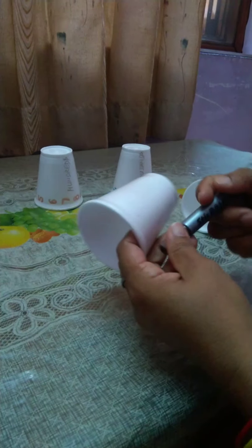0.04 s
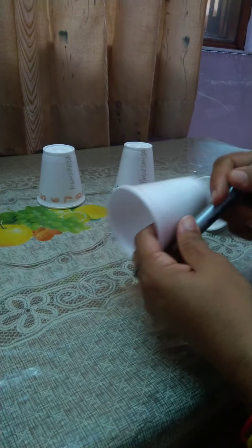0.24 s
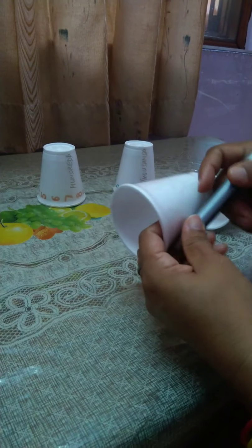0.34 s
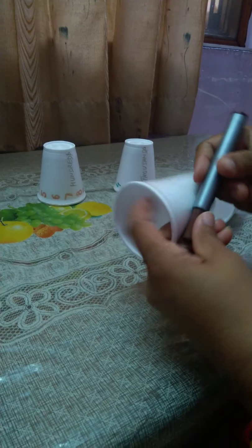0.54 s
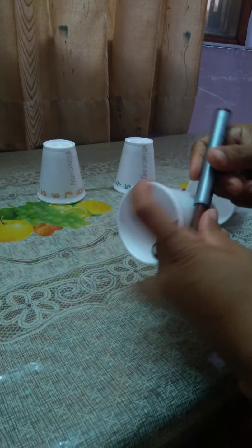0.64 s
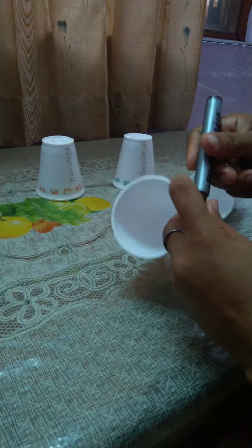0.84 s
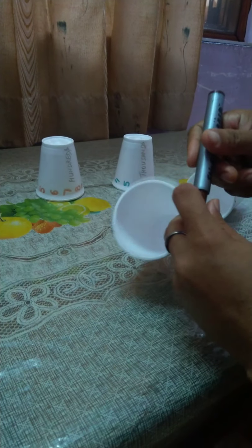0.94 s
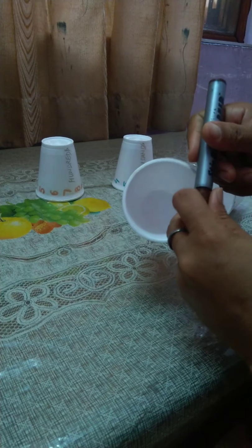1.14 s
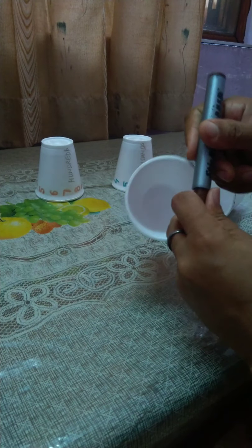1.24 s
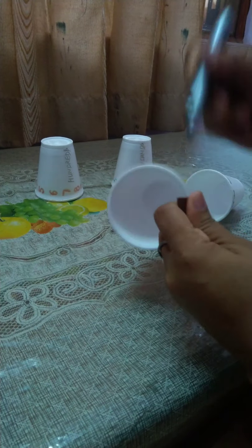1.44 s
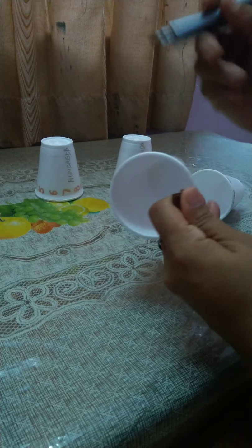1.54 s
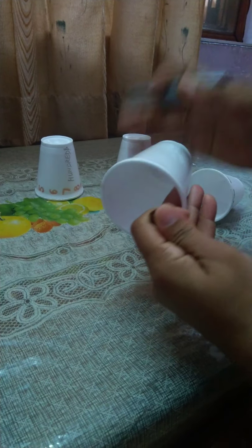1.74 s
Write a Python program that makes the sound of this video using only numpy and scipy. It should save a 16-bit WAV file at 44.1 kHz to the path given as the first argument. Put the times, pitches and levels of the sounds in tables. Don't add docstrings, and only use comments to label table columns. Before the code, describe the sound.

Foam cup handled close up: dry hissing rubs, hard clicky taps, brief scrapes over faint rumble

```python
import sys
import numpy as np
from scipy import signal
from scipy.fft import rfft, irfft
from scipy.io import wavfile
from scipy.ndimage import uniform_filter1d

SR = 44100
rng = np.random.default_rng(int(sys.argv[2]) if len(sys.argv) > 2 else 0)


def bounce(signal):
    frames = np.transpose(np.atleast_2d(signal))
    limited = np.clip(frames, -1, 1)
    pcm = np.round(limited * 32767).astype(np.int16)
    wavfile.write(sys.argv[1], SR, pcm)


def voltage_ratio(decibels):
    exponent = np.asarray(decibels, float) / 20
    return 10 ** exponent


N = 79380
TIME_S = np.arange(N) / SR
HZ = np.fft.rfftfreq(2 * N, 1 / SR)


def read(points, hz):
    f, value = np.transpose(points)
    return np.interp(np.log(hz + 1), np.log(f + 1), value)


def evened(x):
    return x / np.sqrt(np.mean(x ** 2) + 1e-20)


def colour(x, gain):
    return irfft(rfft(x, 2 * N) * gain)[..., :N]


def causal(points):
    log_gain = read(points, HZ) * np.log(10) / 20
    mirrored = np.r_[log_gain, log_gain[-2:0:-1]]
    return np.exp(np.conj(signal.hilbert(mirrored))[:N + 1])


def ring(hz, width_hz):
    return 1j * HZ * width_hz / (hz ** 2 - HZ ** 2 + 1j * HZ * width_hz)


def unit(gain):
    return gain / np.sqrt(np.mean(abs(gain) ** 2))


def modes(table):
    return unit(sum(voltage_ratio(db) * ring(hz, 1.78 * width_hz) ** 2 for hz, width_hz, db in table))


def pair(x, side, lead_s=0):
    half = voltage_ratio(read(side, HZ) / 2) * np.exp(1j * np.pi * HZ * lead_s)
    return colour(x, np.array([half, 1 / half]))


def patches(shape, bins, frames):
    over_hz = uniform_filter1d(rng.standard_normal(shape), size=bins, axis=0)
    return evened(uniform_filter1d(over_hz, size=frames, axis=1))


# start_s, length_s, peak_place (0-1), hiss_db, cup_db
STROKES = [(0.0724, 0.014, 0.05, -81, -87), (0.107, 0.049, 0.8, -57, -105), (0.186, 0.094, 0.7, -52, -60.5),
           (0.259, 0.12, 0.27, -49.5, -49), (0.279, 0.031, 0.58, -42.5, -46),
           (0.364, 0.045, 0.53, -43.5, -55), (0.392, 0.08, 0.32, -35.5, -44.5),
           (0.47, 0.14, 0.13, -47, -60), (0.547, 0.057, 0.08, -39.5, -47), (0.559, 0.052, 0.59, -34, -37.5),
           (0.588, 0.043, 0.81, -31.5, -41), (0.655, 0.14, 0, -58.5, -56.5),
           (0.739, 0.16, 0.31, -56.5, -70.5), (0.858, 0.051, 0.29, -34.5, -44.5),
           (0.87, 0.078, 0.44, -31.5, -39.5), (0.987, 0.022, 0.47, -38.5, -43.5),
           (0.993, 0.029, 0.63, -38, -46), (1.055, 0.02, 0.2, -41, -44.5), (1.121, 0.026, 0.46, -51, -62.5),
           (1.22, 0.13, 0.48, -51.5, -56), (1.312, 0.091, 0.8, -46.5, -59.5),
           (1.439, 0.021, 0.2, -60.5, -53.5), (1.457, 0.17, 0.36, -57, -62.5),
           (1.69, 0.11, 0.6, -81.5, -86.5)]
# start_s, length_s, peak_place (0-1), level_db
DRAGS = [
    (0.026, 0.26, 0.15, -79.5),
    (0.845, 0.13, 0.43, -51.5),
    (0.975, 0.039, 0.1, -64),
    (1.056, 0.027, 0, -53),
    (1.454, 0.12, 0.17, -57.5),
]


def rubbing():
    press = np.array([pressure(start, length, peak) ** 2 for start, length, peak, _, _ in STROKES])
    hiss_power, cup_power = voltage_ratio(2 * np.array(STROKES)[:, 3:].T) @ press
    drag_power = sum(voltage_ratio(2 * db) * pressure(start, length, peak) ** 2 for start, length, peak, db in DRAGS)
    fingers = skin(np.sqrt(hiss_power) * wide_slips())
    body = cup(np.sqrt(cup_power) * slips())
    rim = cover(np.sqrt(drag_power) * slips())
    return fingers + body + rim


def pressure(start, length, peak):
    rise_power, fall_power, flat_top = 2.12, 3.2, 1.8
    u = np.clip((TIME_S - start) / length, 0, 1)
    p = np.clip(peak, .03, .97)
    rise = np.where(u < p, np.sin(np.pi / 2 * u / p) ** 2, 1) ** (rise_power / 2)
    fall = np.where(u > p, np.cos(np.pi / 2 * (u - p) / (1 - p)) ** 2, 1) ** (fall_power / 2)
    return np.tanh(flat_top * rise * fall) / np.tanh(flat_top)


def slips():
    slips_per_s, spread_db = 11000, 1.2
    shudder_s, shudder_db = .003, 1.5
    size = voltage_ratio(spread_db * np.minimum(rng.exponential(1, N), 4)) * rng.standard_normal(N)
    wander = signal.lfilter([1], [1, -np.exp(-1 / (shudder_s * SR))], rng.standard_normal(N))
    happens = np.clip((slips_per_s / SR - rng.random(N)) * 30 + .5, 0, 1)
    return evened(size * happens * voltage_ratio(shudder_db * evened(wander)))


def wide_slips():
    spread = 0.91
    shared = np.sqrt(1 - spread) * slips()
    return shared + np.sqrt(spread) * np.array([slips(), slips()])


# pitch_hz, level_db
SKIN = [(880, -35.5), (1500, -34.5), (1780, -6.5), (2320, -10), (2660, -7), (5770, -2), (6890, -1.5),
        (10500, 10.5), (16000, -4)]
# pitch_hz, width_hz, level_db
BARREL = [(2790, 450, 8), (4220, 590, 8.5), (5565, 320, 6), (8520, 730, -23), (10000, 110, -5),
          (12960, 590, -6)]


def skin(x):
    barrel = sum(voltage_ratio(db) * ring(hz, width_hz) for hz, width_hz, db in BARREL)
    return colour(x, unit(causal(SKIN) * (1 + barrel)))


# pitch_hz, width_hz, level_db
CUP = [(657, 33, -13.5), (787, 100, 7.5), (863.4, 47, 6.5), (1013, 92, 12), (1132, 67, 6.5),
       (1803, 142, 5.5), (2300, 470, -13), (2695, 420, 3), (3386, 520, 0), (4200, 53, -10.5),
       (4910, 320, 5.5), (5450, 170, -10), (6700, 480, -15.5), (6900, 770, -6.5)]


def cup(x):
    return colour(x, modes(CUP))


# pitch_hz, width_hz, level_db
COVER = [(259, 304, 4), (398, 59, -3), (489.5, 56, 7)]


def cover(x):
    return colour(x, modes(COVER))


def shaded(x):
    z = signal.stft(x, SR, nperseg=256)[2]
    shade_db = 3.5 * patches(z.shape[1:], bins=2, frames=20)
    return signal.istft(z * voltage_ratio(shade_db), SR, nperseg=256)[1][:, :N]


# start_s, click_db, cup_db, thump_db
TAPS = [(0.218, -47, -49.5, -58), (0.2363, -43, -52, -59.5), (.549, -65, -42.5, -57),
        (0.8591, -36, -34.5, -34), (0.8608, -22, -36, -53.5), (1.0581, -33, -45, -51.5),
        (1.066, -36.5, -82, -50.5), (1.1275, -41, -62.5, -66), (1.432, -61.5, -51, -55.5),
        (1.4539, -27, -45.5, -53.5), (1.4547, -18.5, -29, -35.5), (0.2724, -50, -42, -52),
        (0.0715, -68, -80, -84), (0.3833, -47, -61, -84), (.9925, -41.5, -58, -72),
        (1.2515, -70, -68.5, -75), (1.265, -61.5, -70.5, -77), (1.274, -60.5, -64, -68.5),
        (1.282, -47.5, -63, -74), (1.315, -53.5, -62.5, -73), (1.384, -37, -66.5, -74),
        (1.444, -45, -46.5, -76)]
# pitch_hz, level_db, t60_s
TABLE = [
    (123.9, -16, 1),
    (160.6, -13.5, 0.41),
    (192.7, -9.5, 0.34),
    (300, -26, 0.091),
]


def taps():
    click_rise_s, click_s, knock_s, thump_rise_s = .0004, 0.0012, 0.00052, 0.0021
    knock_rough, slap_db, puff_db = .5, -5.5, 4
    crack_noise, knock_noise = rng.standard_normal((2, N))
    click, knock, slap, thump = np.zeros((4, N))
    for start, click_db, cup_db, thump_db in TAPS:
        u = np.maximum(TIME_S - start, 0)
        click += voltage_ratio(click_db) * np.minimum(u / click_rise_s, 1) * np.exp(-u / click_s) * crack_noise
        push = u / knock_s * np.exp(1 - u / knock_s) * (1 + knock_rough * knock_noise)
        knock += voltage_ratio(cup_db) * push
        slap += voltage_ratio(thump_db + slap_db) * push
        for hz, db, t60 in TABLE:
            decay = voltage_ratio(thump_db + db - 0.5 - 60 * u / t60)
            thump += decay * np.sin(2 * np.pi * hz * u) * np.minimum(u / thump_rise_s, 1)
    crack = colour(skin(click), 1 / (1 + 1j * HZ / 19700) ** 2)
    puff = voltage_ratio(puff_db) * colour(knock, unit(ring(899, 306) ** 2))
    return crack + cup(knock) + puff + cover(slap), thump


# start_s, length_s, peak_place (0-1), pitch_hz, level_db
SCRAPES = [(.232, 0.011, 0.43, 2820, -52.5), (0.554, 0.074, 0.6, 1450, -58),
           (0.596, .05, 0.66, 2900, -45.5), (.865, 0.083, .4, 3100, -51.5), (0.88, 0.11, 0.58, 1700, -60),
           (1.347, 0.064, 0.44, 4440, -46.5), (1.345, 0.024, 0.65, 3080, -50),
           (1.375, 0.032, 0.25, 2080, -49.5), (1.379, 0.052, 0, 2460, -47.5), (1.453, 0.009, 0, 1700, -37),
           (1.452, 0.007, 0.34, 3070, -43.5), (1.667, 0.061, 0.2, 11640, -66),
           (0.0724, 0.023, .05, 10900, -59), (0.8584, 0.0083, 0.13, 3060, -38.5),
           (1.241, .11, 0.47, 916, -55.5), (0.8635, 0.089, .05, 336, -46),
           (1.4534, 0.012, 0.4, 4800, -32.5), (1.459, 0.096, .05, 4940, -61), (1.446, 0.19, 0, 503, -54)]


def scrapes():
    relative_width = 0.28
    grain = slips()
    out = np.zeros(N)
    for start, length, peak, hz, db in SCRAPES:
        band = unit(ring(hz, relative_width * hz) ** 2)
        out += voltage_ratio(db) * colour(pressure(start, length, peak) * grain, band)
    return out


# start_s, length_s, from_hz, to_hz, level_db
SQUEAKS = [(1.744, .016, 3090, 3100, -72)]
SQUEAK_WIDTHS = [50]


def squeaks():
    out = np.zeros(N)
    for (start, length, from_hz, to_hz, db), width_hz in zip(SQUEAKS, SQUEAK_WIDTHS):
        pitch_hz = np.interp(TIME_S, [start, start + length], [from_hz, to_hz])
        phase = 2 * np.pi * np.cumsum(pitch_hz) / SR
        a, b = evened(colour(rng.standard_normal((2, N)), 1 / (1 + (HZ / width_hz) ** 2)))
        tone = (a + 2) * np.cos(phase) + b * np.sin(phase)
        out += voltage_ratio(db) * pressure(start, length, 0.7) * tone
    return out


# start_s, length_s (negative runs back in time), peak_place
# (clipped to 0-1), level_db
LEAN = (4, -4, -1, -67)


def lean():
    start, length, peak, db = LEAN
    hum = evened(colour(rng.standard_normal(N), ring(122, 28) ** 2))
    return voltage_ratio(db) * pressure(start, length, peak) * hum


# pitch_hz, t60_s
ROOM = [(200, 0.39), (600, 0.21), (2000, 0.32), (5000, 0.33), (10000, 0.26), (16000, 0.082)]
# pitch_hz, level_db
ROOM_SIDE = [(200, -3), (1000, -9.5), (4000, -6), (10000, -6), (16000, 13)]


def room(x):
    level_db, start_s, rise_s = -6.5, 0.0026, 0.0015
    echoes = np.zeros((2, SR))
    at = np.arange(0, SR - 20, 20) + rng.integers(0, 20, (2, SR // 20 - 1))
    np.put_along_axis(echoes, at, rng.choice([-1., 1.], at.shape), 1)
    echoes *= np.clip((np.arange(SR) / SR - start_s) / rise_s, 0, 1)
    hz, t, z = signal.stft(echoes, SR, nperseg=256)
    decay = voltage_ratio(-60 * t / read(ROOM, hz)[:, None])
    tail = signal.istft(z * decay, SR, nperseg=256)[1]
    wet = signal.fftconvolve(x[None], tail / np.linalg.norm(tail[0]), axes=1)[:, :N]
    return voltage_ratio(level_db) * pair(wet, ROOM_SIDE)


def low_balance(x):
    left_minus_right_db = -6.5
    return x * voltage_ratio(np.array([[.5], [-.5]]) * left_minus_right_db)


# pitch_hz, level_db
RUMBLE = [(12, -49), (20, -37.5), (41, -6), (65, 10.5), (91, -9), (124, 6.5), (198, 0.5), (222, -11.5),
          (420, -38.5), (550, -56), (920, -120)]
# time_s, level_db
RUMBLE_LEVEL = [(0.0, -50.5), (0.134, -52.5), (0.304, -48.5), (0.486, -60), (0.832, -54), (0.862, -58),
                (0.972, -56), (1.082, -48), (1.18, -53), (1.438, -48.5), (1.448, -54.5), (1.8, -61.5)]


def rumble():
    same = 0.92
    a, b = rng.standard_normal((2, N))
    ports = np.array([a, same * a + np.sqrt(1 - same ** 2) * b])
    x = colour(ports, voltage_ratio(read(RUMBLE + [(700, -46.5)], HZ)))
    time_s, level_db = np.transpose(RUMBLE_LEVEL)
    return low_balance(evened(x) * voltage_ratio(np.interp(TIME_S, time_s, level_db)))


# pitch_hz, level_db
HISS = [(250, -9), (700, -6), (1500, -16), (4500, -19.5), (8700, -21), (9500, -7), (11500, -6),
        (16000, -22)]
# pitch_hz, level_db
HISS_SIDE = [(60, 7), (180, -30.5), (550, -3), (1650, -7), (4970, 6), (15000, 28.5)]
# time_s, level_db
HISS_SETTLES = [(0, 0), (0.098, -1), (1.5, 0), (1.66, -3.5), (1.8, -3)]


def hiss():
    x = colour(rng.standard_normal((2, N)), voltage_ratio(read([(100, -59.5)] + HISS, HZ)))
    settle_db = np.interp(TIME_S, *np.transpose(HISS_SETTLES))
    return voltage_ratio(-64 - 7.5) * pair(evened(x), HISS_SIDE) * voltage_ratio(settle_db)


# pitch_hz, level_db
NEAR_SIDE = [(60, 0), (150, -4), (380, -6), (950, -4), (2380, 1.5), (5980, 3.5), (15000, 8)]


def scene():
    knocks, thump = taps()
    hands = shaded(rubbing()) + knocks + scrapes()
    near = pair(hands + squeaks(), NEAR_SIDE, lead_s=0.00012)
    table = low_balance(thump + lean())
    return near + room(hands[0]) + table + rumble() + hiss()


# pitch_hz, threshold_db
GATE_EAGER = [(1300, 0), (2200, 1.5), (3500, 2.5), (5000, .5), (7000, 3), (8500, 2), (10000, -.5),
              (13000, 0), (16000, 2)]


def gate(x):
    threshold_db, depth_db, scatter_db = -5.0, -36, 3.0
    hz, t, z = signal.stft(x, SR, nperseg=1024)
    treble = hz[:, None] > 1300
    power = (abs(z) ** 2).mean(0) * treble
    near = uniform_filter1d(power, size=5, axis=0)
    far = uniform_filter1d(power, size=100, axis=0)
    under_db = uniform_filter1d(10 * np.log10(abs(near / far) + 1e-12), size=3, axis=1)
    scattered_db = np.maximum(under_db, threshold_db + 2)
    scattered_db = scattered_db + scatter_db * patches(power.shape, bins=5, frames=7)
    below = scattered_db < threshold_db + read(GATE_EAGER, hz)[:, None] - 1
    total = power.sum(0)
    below = below * (total < 2 * np.roll(total, 4))
    return signal.istft(z * voltage_ratio(depth_db * below * treble), SR, nperseg=1024)[1][:, :N]


def top_cut(x):
    return signal.sosfilt(signal.butter(12, 16810, fs=SR, output="sos"), x)


def record(dry):
    edge_hz = 15950
    fade_db = np.interp(TIME_S, [1.75, N / SR], [0, -6])
    limits = [(22, -10), (45, 0), (edge_hz, 0), (edge_hz + 300, -45)]
    band = colour(dry, voltage_ratio(read(limits, HZ)))
    mix = gate(band * voltage_ratio(fade_db))
    return top_cut(mix)


dry = scene()
out = record(dry)
bounce(out)
```